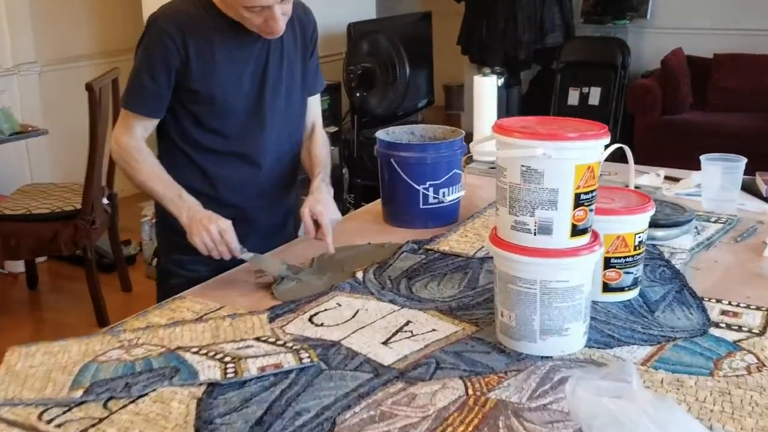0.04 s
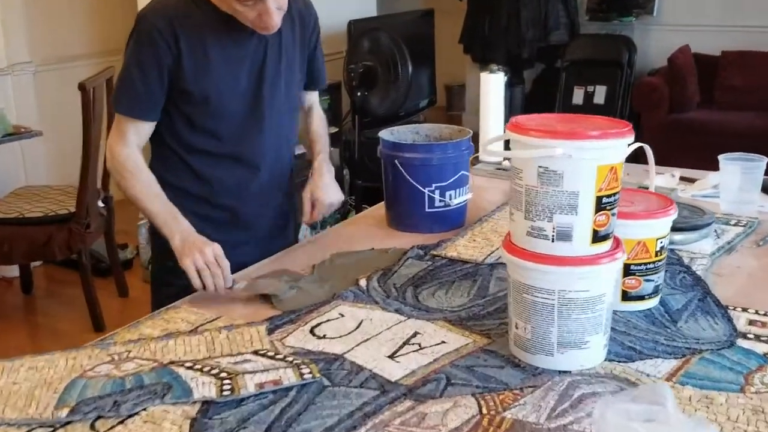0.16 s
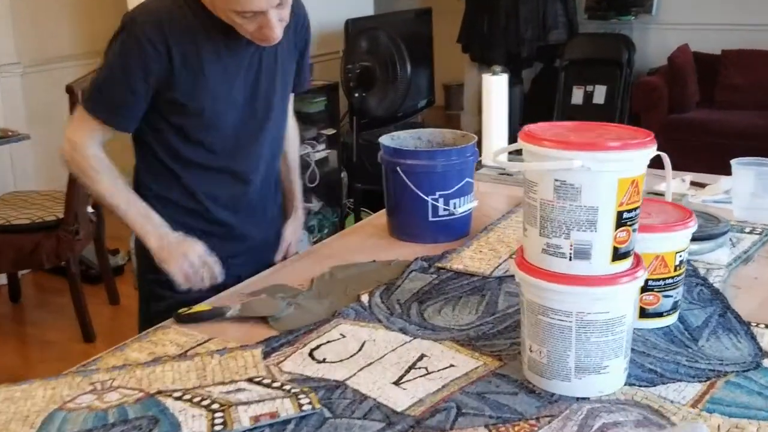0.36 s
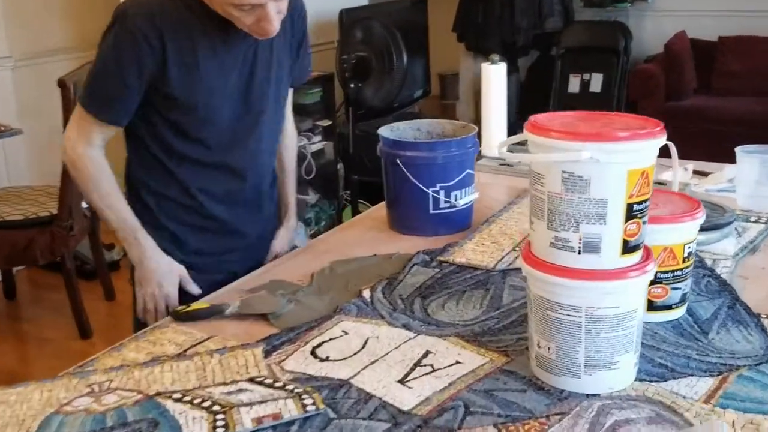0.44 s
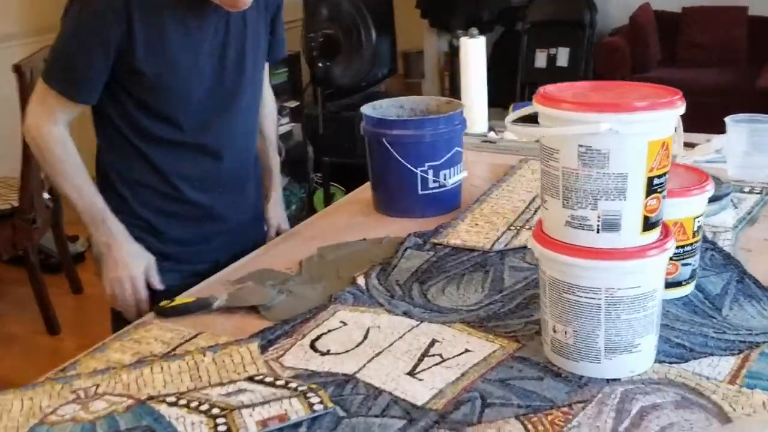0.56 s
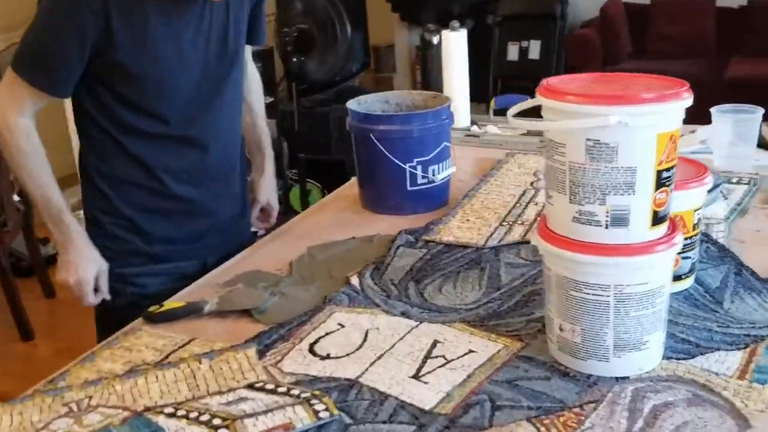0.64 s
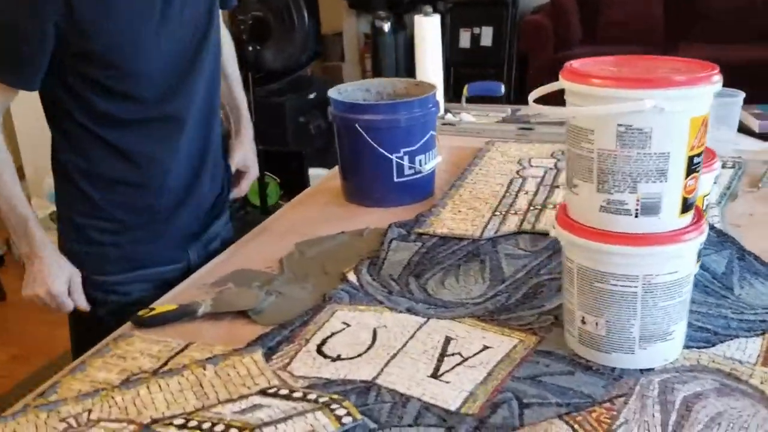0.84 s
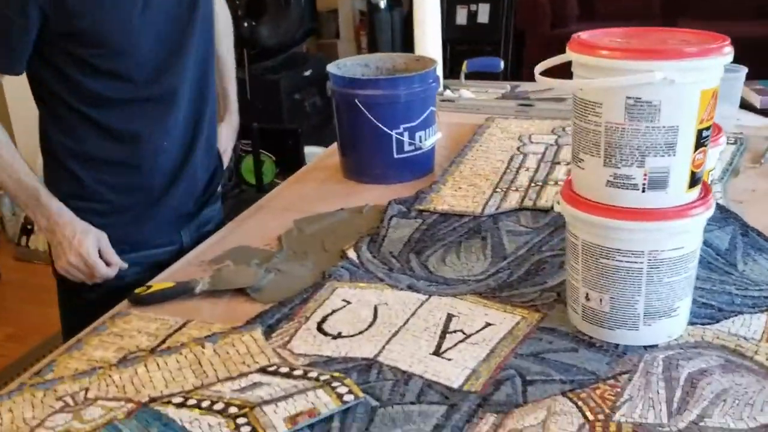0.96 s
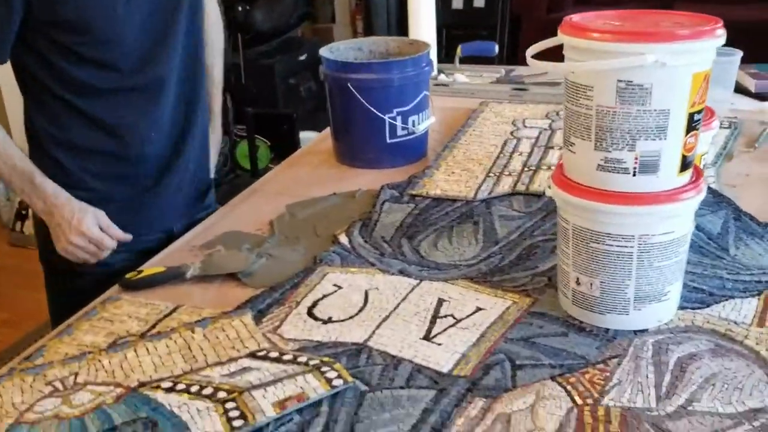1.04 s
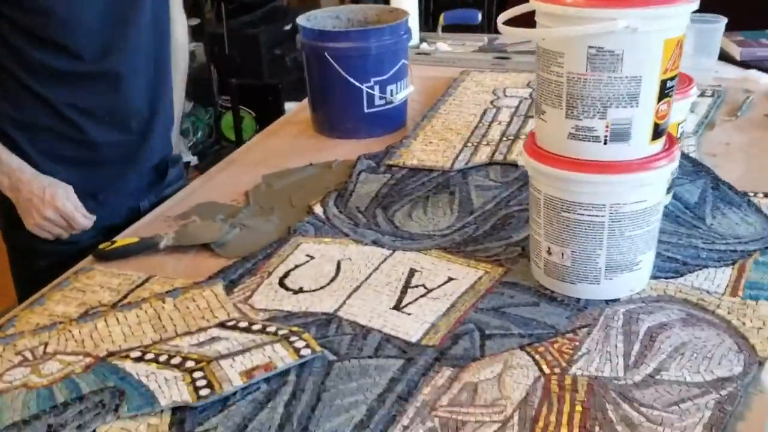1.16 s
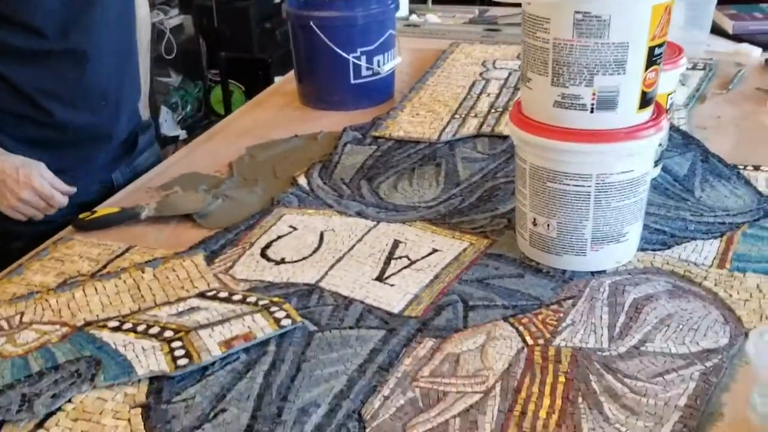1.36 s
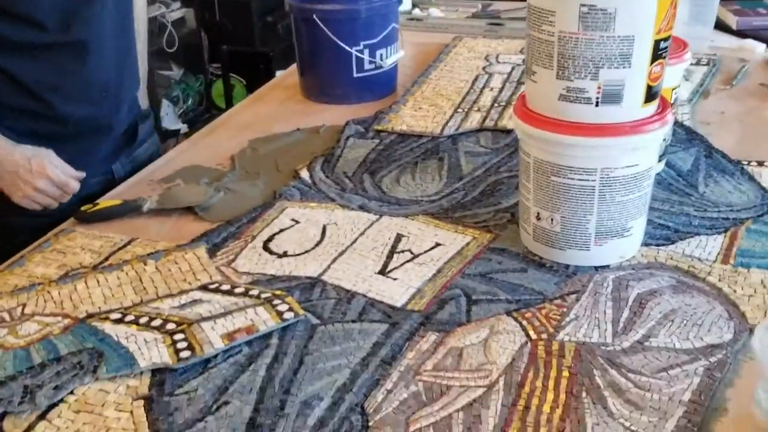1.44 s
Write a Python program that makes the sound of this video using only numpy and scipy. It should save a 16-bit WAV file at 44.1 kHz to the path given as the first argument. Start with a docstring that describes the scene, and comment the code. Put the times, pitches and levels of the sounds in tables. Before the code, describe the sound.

A putty knife lands on a wooden table with one dull, rattling knock, with light scrapes just before and after. Clothes then rustle faintly, with a few small taps and bumps, over low room noise.

```python
"""At a wooden work table in a furnished room, a putty knife is put down. Its handle lands with one dull,
rattling knock: quick contacts shake tool and table, the top rings on and the room answers.
Light scrapes come before and after it; then clothes rustle as the worker steps back, with a few small
taps, ticks and bumps. Low room noise lies under everything and a soft low drone swells near the end."""
import sys
import numpy as np
from scipy import signal
from scipy.fft import rfft, irfft, next_fast_len
from scipy.io import wavfile
from scipy.ndimage import map_coordinates

SR = 44100
rng = np.random.default_rng(int(sys.argv[2]) if len(sys.argv) > 2 else 0)


def master(y):
    """Save y as 16-bit WAV."""
    cut = np.clip(np.atleast_2d(y).T, -1, 1)
    pcm = np.round(cut * 32767)  # scale
    wavfile.write(sys.argv[1], SR, pcm.astype(np.int16))


N = 66150
T = np.arange(N) / SR


def amp(db):
    """Decibels to gain."""
    return 10 ** (np.asarray(db) / 20)


def unit(x):
    """Scale to rms 1."""
    return x / np.sqrt(np.mean(x ** 2) + 1e-20)


def along(points, hz):
    """Read a curve of (Hz, value) points on a log frequency axis."""
    f, v = np.transpose(points)
    return np.interp(np.log(hz + 1), np.log(f + 1), v)


def level(rows):
    """A fader ride through (seconds, dB) points."""
    return amp(np.interp(T, *np.transpose(rows)))


def pan(db):
    """Left and right gains; positive dB leans left."""
    return amp(np.array([[db], [-db]]) / 2)


def wobble(rate):
    """A smooth random curve, rate knots a second."""
    return map_coordinates(rng.standard_normal(N // 10), [T * rate + 2])


def fade(start, t60):
    """A sudden onset that decays by 60 dB in t60 seconds."""
    return (T >= start) * np.exp(-np.log(1000) * np.maximum(T - start, 0) / t60)


def filtered(x, response):
    """Pass x through a complex frequency response."""
    size = next_fast_len(N + SR // 2)
    return irfft(rfft(x, size) * response(np.fft.rfftfreq(size, 1 / SR)), size)[..., :N]


def resonance(f, hz, width):
    """Causal response of one resonance."""
    return 1j * f * width / (hz * hz - f * f + 1j * f * width)


def band(hz, width):
    """Stereo noise of rms 1 ringing in one resonance."""
    return unit(filtered(rng.standard_normal((2, N)), lambda f: resonance(f, hz, width) ** 2))


# Stereo image of the room. Each row: frequency in Hz, left-right likeness (1 is mono).
STEREO_LIKENESS = [(50, 0.98), (250, 0.91), (500, 0.74), (1000, 0.21), (2500, 0), (8000, 0.076)]
def noise(colour):
    """Coloured stereo noise of rms 1, near mono in the bass."""
    def response(f):
        spread = np.arccos(np.clip(along(STEREO_LIKENESS, f), -1, 1)) / 2
        return amp(along(colour, f)) * [np.cos(spread), np.sin(spread)]
    mid, side = filtered(rng.standard_normal((2, N)), response)
    return unit(np.array([mid + side, mid - side]))


# EQ of the air and of the rumble. Each row: frequency in Hz, relative level in dB.
AIR_EQ = [(90, -25), (170, -2), (290, -2.5), (380, -6.5), (520, -11), (950, -10), (1400, -16), (1950, -20),
          (2500, -31), (4000, -37), (7000, -48.5), (9000, -52), (13000, -37.5), (16000, -42)]
RUMBLE_EQ = [(15, -2), (30, -10.5), (50, 2), (80, -2), (110, -1), (150, -9), (220, -16), (400, -48)]
# Fader ride of the air. Each row: time in seconds, level in dB.
AIR_FADER = [(0, -53.5), (0.45, -54.5), (0.75, -52), (1.05, -52.5), (1.3, -50.5), (1.5, -51)]
def room_tone(rumble_db=-52):
    """A bed of soft room air over a steady rumble."""
    return level(AIR_FADER) * noise(AIR_EQ) + amp(rumble_db) * noise(RUMBLE_EQ)


def drone(hz=91.1, db=-45.5, octave_db=-10.5, peak_s=1.371, swell_s=0.077):
    """A low, slightly wavering tone and its octave swell once."""
    phase = 2 * np.pi * hz * T + 0.18 * wobble(15)
    swell = np.exp(-((T - peak_s) / swell_s) ** 2 / 2)
    return amp(db) * swell * unit(np.sin(phase) + amp(octave_db) * np.sin(2 * phase))


# EQ of the fabric. Each row: frequency in Hz, relative level in dB.
CLOTH_EQ = [(300, -11), (900, -2), (2000, 11), (3500, 4), (5200, 0.5), (7500, 4), (9000, -3.5), (12500, 6),
            (14500, -3), (16000, -9)]
# Fader ride of the rustle. Each row: time in seconds, level in dB.
CLOTH_FADER = [(0, -75), (0.13, -64), (0.21, -70), (0.48, -69), (0.62, -68), (0.71, -63), (0.8, -61.5),
               (0.865, -60), (0.93, -64), (1.02, -57.5), (1.12, -58), (1.22, -60.5), (1.33, -80.5),
               (1.45, -77.5), (1.5, -58)]
def clothes(grain_db=1.0, flutter_db=0.75):
    """Fabric rubs in fine grains, swelling with the step back."""
    texture = amp(grain_db * wobble(440) + flutter_db * wobble(29.3))
    return level(CLOTH_FADER) * unit(noise(CLOTH_EQ) * texture)


# Faint thuds. Each row: centre in seconds, level in dB, pitch in Hz, half length in seconds.
LOW_BUMPS = [(0.052, -40, 125, 0.0043), (0.258, -41, 112, 0.013), (0.42, -46, 211, 0.012),
             (0.535, -50, 105, 0.0049), (0.619, -46, 116.6, 0.028), (0.822, -48, 194, .006),
             (1.215, -47.5, 65, 0.023)]
def bumps():
    """Soft low pushes against table and floor, a few cycles each."""
    return sum(amp(db) * np.exp(-((T - centre) / half) ** 2 / 2) * np.sin(2 * np.pi * hz * (T - centre))
               for centre, db, hz, half in LOW_BUMPS)


# Tap cues. Each row: start in seconds, level in dB, pan in dB, decay in seconds, ring in Hz.
SOFT_TAPS = [(0.576, -50, -7, 0.055, 2140), (0.582, -59, -6, 0.28, 2650), (0.787, -59.5, -11, 0.063, 2350),
             (0.857, -56, -8, 0.056, 1700), (1.451, -63, -16, .04, 2510), (1.451, -64.5, 12, 0.027, 4170),
             (1.466, -56.5, -4, 0.037, 2600)]
# EQ of the puff in each tap. Each row: frequency in Hz, relative level in dB.
PUFF_EQ = [(200, -5), (900, -12), (1700, 5), (3300, -13), (4200, -33), (9000, -29), (16000, -55)]
def taps(width_hz=730, puff_db=-3.5):
    """Dull contacts as the worker moves, each a ringing band with a puff of noise."""
    return sum(amp(db) * pan(pan_db) * fade(start, t60)
               * (band(hz, width_hz) + amp(puff_db) * noise(PUFF_EQ))
               for start, db, pan_db, t60, hz in SOFT_TAPS)


# Tick cues. Each row: start in seconds, level in dB, centre in Hz.
TINY_TICKS = [(0.631, -49, 7500), (0.828, -49.5, 14500)]
def ticks(t60=0.01, width_hz=7900):
    """Tiny bright contacts that die at once."""
    return sum(amp(db) * fade(start, t60) * band(hz, width_hz) for start, db, hz in TINY_TICKS)


# Scrape cues. Each row: start and length in seconds, level in dB, first and last pitch in Hz.
LIGHT_SCRAPES = [(-0.04, 0.19, -63, 4560, 4360), (0.252, 0.15, -55.5, 4285, 3930)]
# EQ of their fizz. Each row: frequency in Hz, relative level in dB.
FIZZ_EQ = [(1500, 1.5), (2700, 5.5), (5500, -3), (7500, -0.5), (10000, -13), (13000, -3), (16000, -13)]
def scrapes(half_width_hz=540, fizz_db=-3.5, roughness=0.18):
    """Light friction: a narrow, sinking hiss with a little broad fizz around it."""
    out = np.zeros((2, N))
    for start, length, db, first_hz, last_hz in LIGHT_SCRAPES:
        progress = np.clip((T - start) / length, 0, 1)
        pitch = first_hz + (last_hz - first_hz) * progress
        flutter = filtered(rng.standard_normal((2, N)), lambda f: 1 / (1 + (f / half_width_hz) ** 4))
        hiss = unit(flutter * np.sin(2 * np.pi * np.cumsum(pitch) / SR))
        stroke = np.sin(np.pi * progress) ** 2 * np.exp(roughness * wobble(115.9))
        out += amp(db) * stroke * (hiss + amp(fizz_db) * noise(FIZZ_EQ))
    return out


# EQ of the reverb. Each row: frequency in Hz, relative level in dB.
REVERB_EQ = [(50, -18), (120, -6), (190, -10), (320, -4.5), (520, -5), (750, 0), (1150, -3.5), (1600, -1),
             (1970, -7.5), (2300, -18), (3300, -20), (4000, -33), (4600, -43), (6000, -48), (7800, -47),
             (9500, -65)]
# Length of the reverb. Each row: frequency in Hz, decay in seconds.
REVERB_T60 = [(100, 0.15), (400, 0.24), (1000, 0.21), (2000, 0.19), (3200, 0.15), (8000, .25)]
def room_reverb(start, build_s, db=-24.5):
    """The furnished room answers the knock with a short diffuse tail; each band dies at its own speed."""
    hz, t, spectrum = signal.stft(noise(REVERB_EQ), SR, nperseg=256)
    decay = np.exp(-np.log(1000) * np.maximum(t - start, 0) / along(REVERB_T60, hz)[:, None])
    tail = signal.istft(spectrum * decay, SR, nperseg=256)[1][:, :N]
    return amp(db) * np.clip((T - start) / build_s, 0, 1) * tail


# Modes of the table top. Each row: pitch in Hz, relative level in dB, decay in seconds.
TABLE_MODES = [(124.7, -33, 0.1), (231.4, -47, 0.09), (306, -38.5, 0.18), (367, -34.5, .14),
               (698, -39.5, 0.2), (810, -45, 0.081), (924, -32.5, 0.22), (1170, -35.5, 0.25),
               (1410, -46, 0.33), (1470, -22, 0.1), (1726, -42, 0.29), (1606, -44, 0.13),
               (1730, -50, 0.083), (1984, -36, 0.17)]
def table_ring(start, build_s, gain_db=1.5):
    """The blow spreads through the top, which rings briefly; high modes reach the sides out of step."""
    phases = rng.uniform(-np.pi, np.pi, (len(TABLE_MODES), 2))
    ring = 0
    for (hz, db, t60), (phase, skew) in zip(TABLE_MODES, phases):
        apart = skew * (1 - along(STEREO_LIKENESS, hz)) * np.array([[1], [-1]]) / 2
        ring += amp(db) * fade(start, t60) * np.sin(2 * np.pi * hz * (T - start) + phase + apart)
    return amp(gain_db) * np.clip((T - start) / build_s, 0, 1) * ring


def blade_crack(db=-51.5):
    """The steel blade adds a faint bright crack to the knock."""
    return amp(db) * fade(start=0.2326, t60=0.029) * band(hz=6560, width=1700)


# The rattle. Each row: time in seconds, relative level in dB, pan in dB, left lag in milliseconds.
KNIFE_CONTACTS = [(0.23249, -17.6, -7.8, 0.05), (0.23281, -5.9, -0.2, 0.12), (0.23381, -1.5, -4.4, 0.07),
                  (0.23799, -11, -4.5, 0.19)]
# Body of tool and table. Each row: centre in Hz, width in Hz, relative level in dB.
BODY_RESONANCES = [(221, 170, -11), (349, 90, 4.5), (765, 200, -1), (1002, 56, -3), (1195, 210, -8),
                   (1429, 187, 2), (1699, 163, 1), (1997, 76, -5), (2229, 238, -19), (2970, 221, -20),
                   (3054, 242, -20), (3582, 197, -27), (4450, 350, -30)]
def knock(gain_db=21, soft_hz=2920):
    """Handle and blade land in quick, soft contacts that drive the broad resonances."""
    def response(f):
        sides = np.array([[1], [-1]]) / 2000  # half the lag on each side, ms to s
        blows = sum(amp(db) * pan(pan_db) * np.exp(-2j * np.pi * f * (time + lag * sides))
                    for time, db, pan_db, lag in KNIFE_CONTACTS)
        body = sum((-1) ** k * amp(db) * resonance(f, hz, width)
                   for k, (hz, width, db) in enumerate(BODY_RESONANCES))
        lowpass = 1 / (1 - (f / soft_hz) ** 2 + 1j * f / soft_hz)
        return amp(gain_db) * blows * body * lowpass
    return filtered(signal.unit_impulse(N), response)


def scene(ring_s=0.2338, predelay_s=0.0034, build_s=0.0057):
    """The knock, a little to the right, in its room, with the small sounds around it."""
    hit = pan(-0.5) * (knock() + blade_crack())
    tail = table_ring(ring_s, build_s) + room_reverb(ring_s + predelay_s, build_s)
    return hit + tail + scrapes() + taps() + ticks() + bumps() + clothes() + room_tone() + drone()


def record(dry):
    """A brick-wall high cut takes off the very top."""
    return filtered(dry, lambda hz: hz < 15850)


dry = scene()
out = record(dry)
master(out)
```